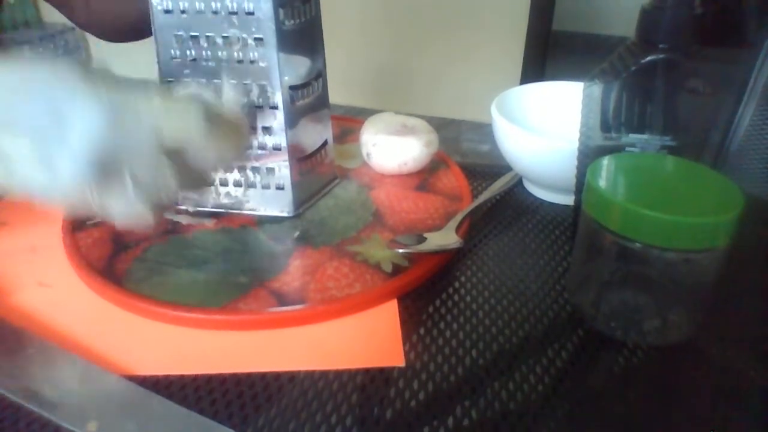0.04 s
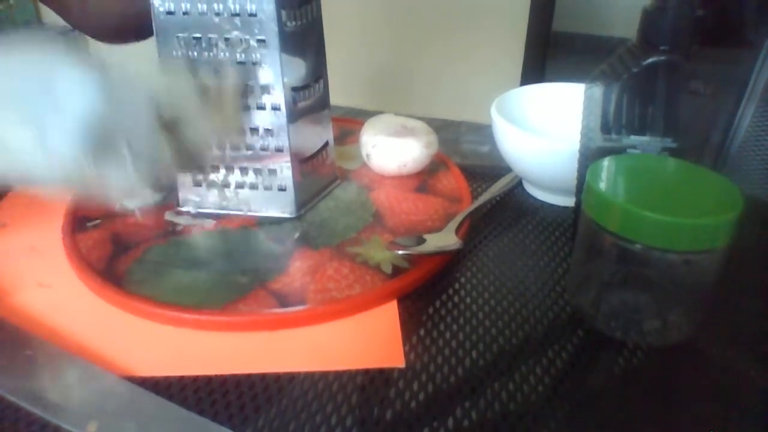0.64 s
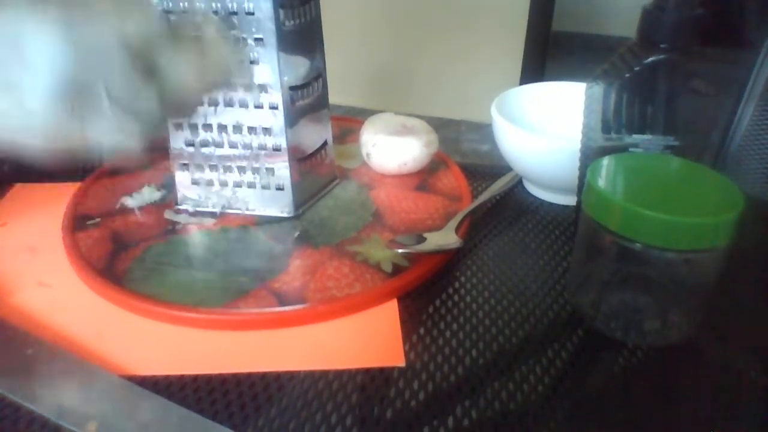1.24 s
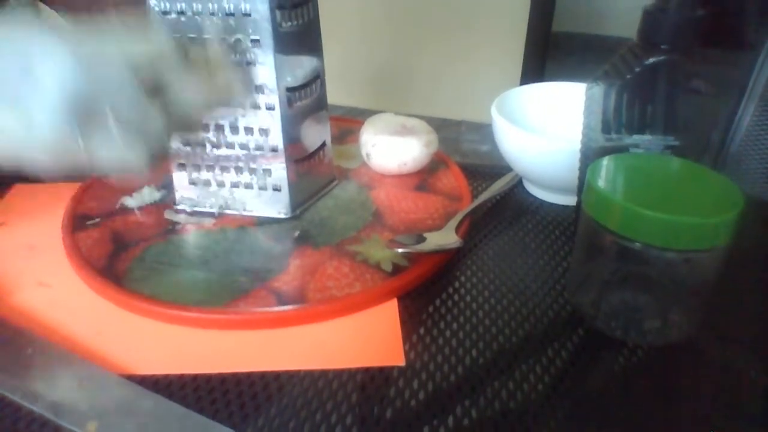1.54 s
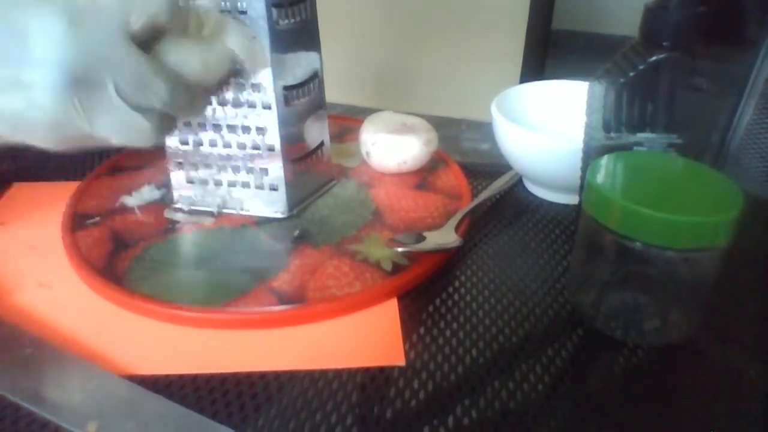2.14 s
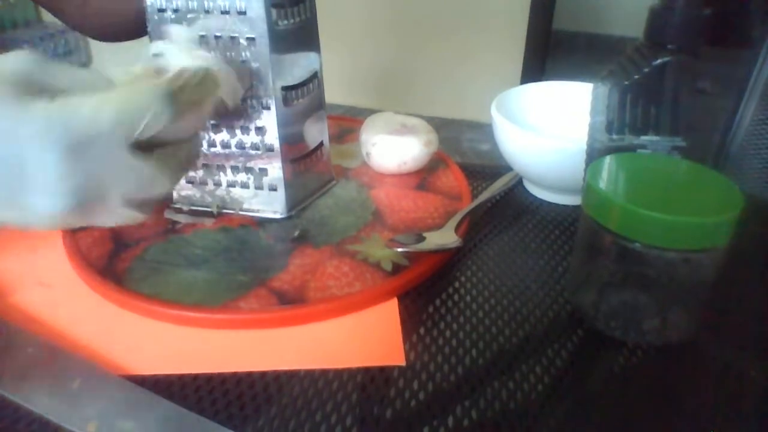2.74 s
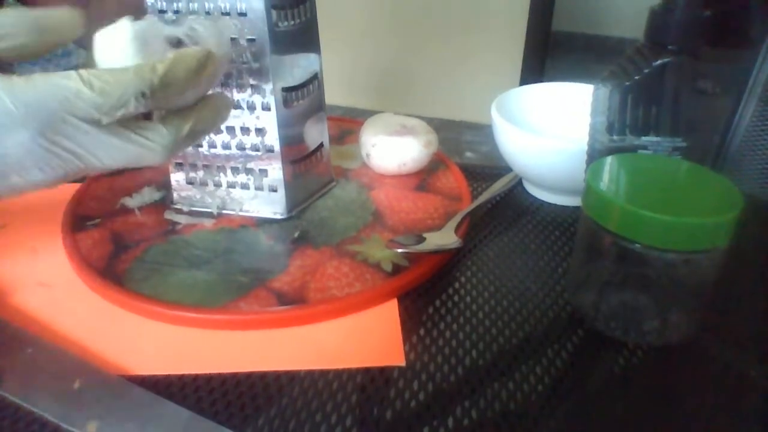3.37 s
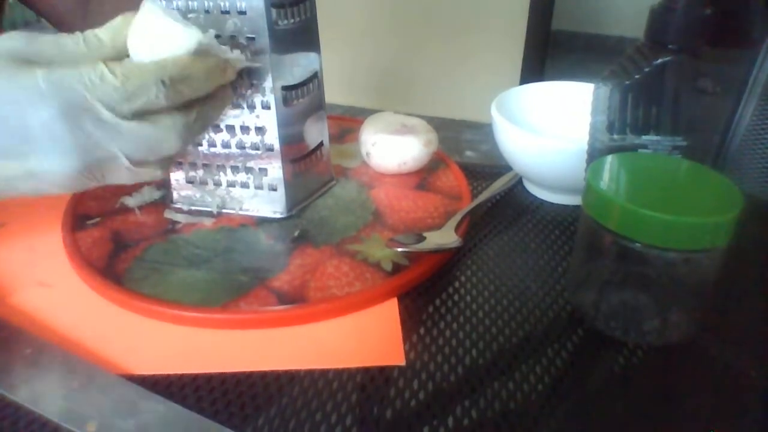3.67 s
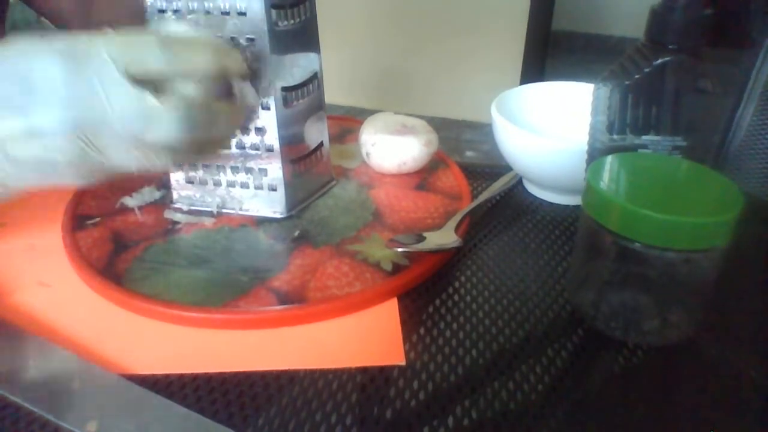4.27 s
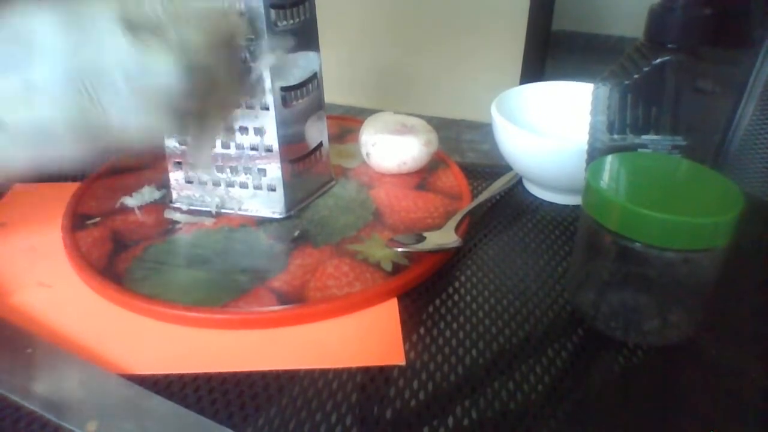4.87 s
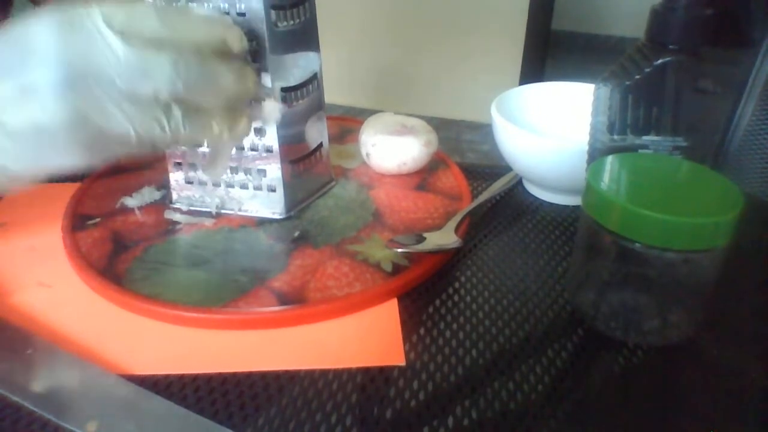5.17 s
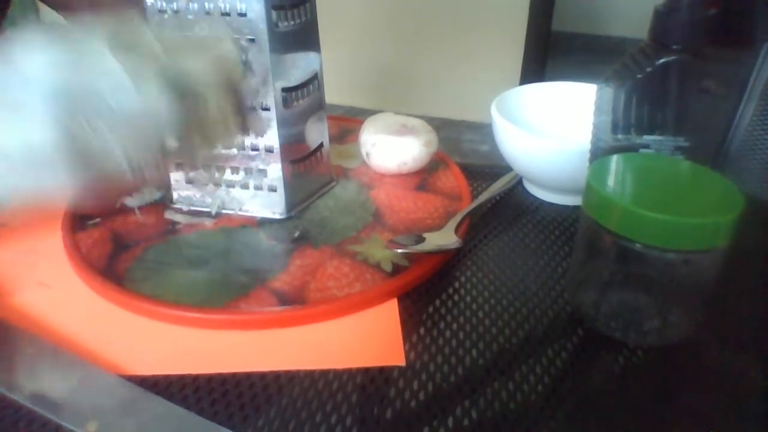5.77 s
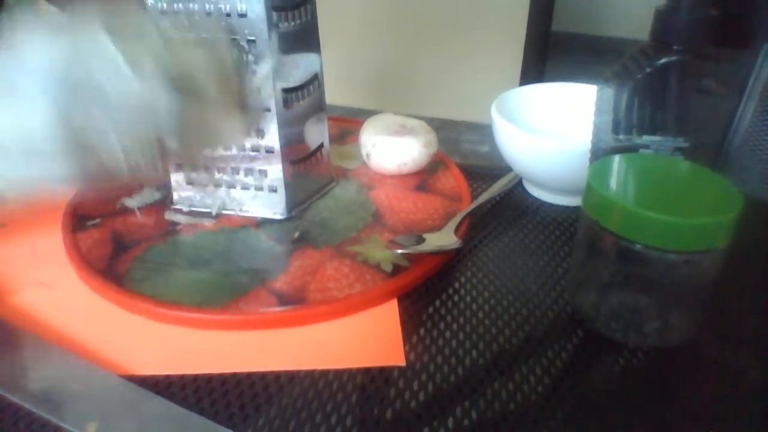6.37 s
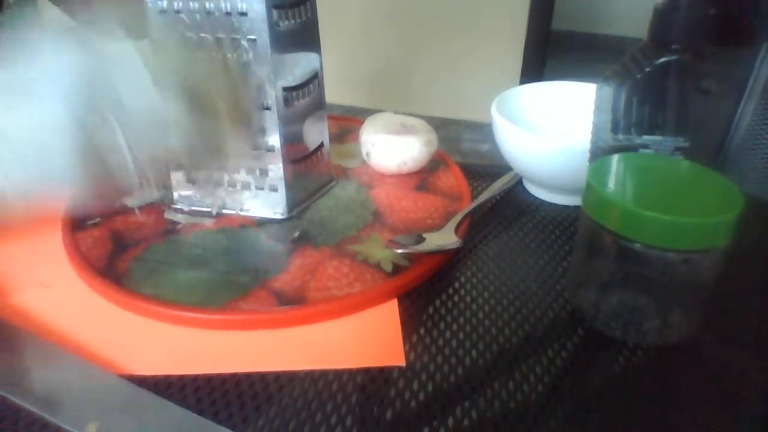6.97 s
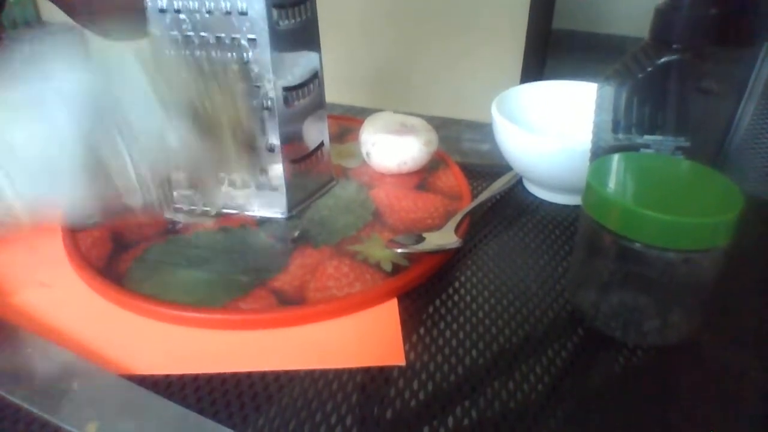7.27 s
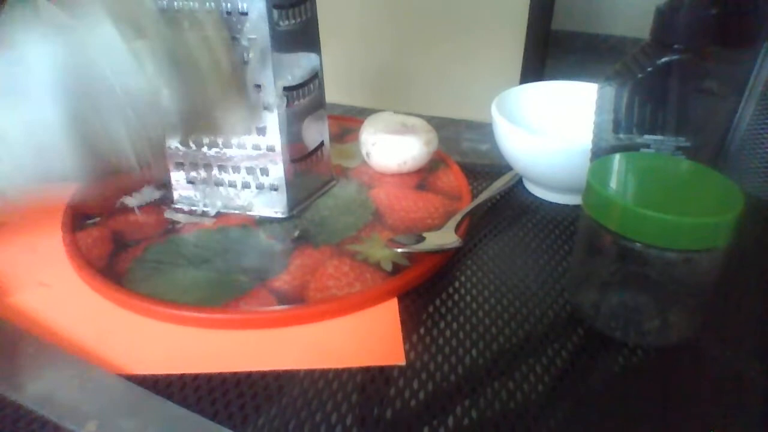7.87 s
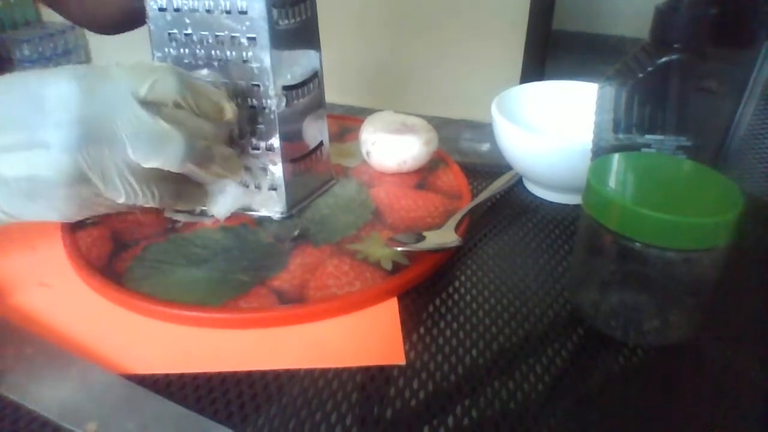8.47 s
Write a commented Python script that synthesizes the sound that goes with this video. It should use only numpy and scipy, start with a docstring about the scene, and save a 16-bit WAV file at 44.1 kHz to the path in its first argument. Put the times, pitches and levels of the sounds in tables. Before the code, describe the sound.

From the start, an onion is grated on a steel box grater close to the microphone, about seven strokes a second. Each stroke is a wet, crunchy rasp with a hollow metallic ring, broken by sharp snags and little spits of juice. The grater knocks on a plastic tray, and tiny high pings come around 2 seconds. The strokes stop at about 2.5 seconds, leaving a lull with a soft bump near 3.8. Grating restarts gently at 4.2 seconds and is strong from 4.5, with faint wet squeaks until 5.7 and a heavier thud near 7.3. It ends around 8.3 seconds, followed by one light knock at 8.5. The table shakes the microphone, adding a deep rumble that swells during both bouts. A small fan hums steadily throughout, with faint hiss and a thin, pulsing electronic whine. The kitchen adds only a slight, short echo.

```python
"""In a kitchen, an onion is rubbed up and down a steel box grater standing on a plastic tray,
in two bouts with a pause to change grip. The teeth tear the flesh and make the steel sheet ring;
the onion snags, spits juice and squeals, and the grater knocks on the tray. The arm's effort shakes
the table and the microphone standing on it. A small fan hums nearby and electronics whine faintly."""
import sys
import numpy as np
from scipy import signal
from scipy.fft import rfft, irfft, next_fast_len
from scipy.io import wavfile
from scipy.ndimage import uniform_filter1d, map_coordinates

SR = 44100
rng = np.random.default_rng(int(sys.argv[2]) if len(sys.argv) > 2 else 0)


def log_audio(samples):
    """Write samples as a 16-bit WAV file to the path given in sys.argv[1]."""
    # one column per channel
    frames = np.atleast_2d(samples).T
    # limit to full scale, then quantise
    limited = np.clip(frames, -1, 1)
    pcm = np.round(limited * 32767).astype(np.int16)
    wavfile.write(sys.argv[1], SR, pcm)


N = 384552
TIME = np.arange(N) / SR

# Passes over the teeth, about seven a second. Each row: start in seconds, force in dB.
STROKES = [(0, -43), (0.13, -38), (0.264, -39), (0.416, -37), (0.571, -38.5), (0.7, -36.5), (0.843, -39.5),
           (0.972, -35.5), (1.116, -38.5), (1.252, -35.5), (1.401, -40.5), (1.54, -40.5), (1.708, -41.5),
           (1.838, -38), (1.967, -41.5), (2.115, -37.5), (2.262, -40.5), (2.377, -41.5), (4.191, -50),
           (4.338, -48), (4.486, -37.5), (4.628, -40.5), (4.814, -39.5), (4.959, -42.5), (5.126, -42),
           (5.269, -42), (5.416, -37), (5.532, -39.5), (5.68, -38), (5.826, -38), (5.989, -36.5),
           (6.124, -38), (6.278, -36.5), (6.414, -38), (6.566, -36), (6.711, -38.5), (6.874, -35.5),
           (7.014, -36.5), (7.169, -37), (7.315, -37), (7.477, -35), (7.606, -38), (7.76, -37.5),
           (7.909, -38.5), (8.049, -36.5)]
# The onion rubs on while the hand turns. Each row: middle and half length in seconds, force in dB.
TURN_RUBS = [(0.248, 0.046, -40), (2.27, 0.016, -39), (2.407, 0.039, -50), (4.304, 0.026, -52),
             (8.224, .035, -45.5)]
# The onion catches hard on the teeth. Each row: time in seconds, jolt in dB, wet snap in dB.
SNAGS = [(0.15, -8, -30), (0.441, -6.5, -31.5), (0.486, -17, -45.5), (0.53, -26, -37), (0.64, -14, -46),
         (0.724, -9, -34), (0.764, -9, -43), (0.811, -19, -40), (0.985, -15.5, -29), (1.041, -18, -37),
         (1.069, -16, -39), (1.314, -7, -47), (1.361, -14, -31), (1.562, -14.5, -48), (1.609, -4, -31),
         (1.624, -8, -36), (1.656, -8, -37), (1.771, -13, -37), (1.89, -5.5, -45), (2.169, -3.5, -30),
         (2.179, -5.5, -39), (2.475, -14.5, -39), (2.53, -28, -53), (4.198, -18, -36), (4.216, -14.5, -41),
         (4.433, -19, -38), (4.839, -16, -53), (5.929, -11, -39), (6.903, -11, -36), (6.93, -11.5, -48),
         (7.052, -9, -51), (7.087, -10, -47), (7.508, -9.5, -39), (7.831, -6.5, -41), (8.566, -36, -54)]
# Plucked teeth. Each row: start in seconds, level in dB, seconds to fade by 60 dB,
# overtone in dB compared with the note.
TOOTH_PINGS = [(1.668, -44, .12, -16), (1.911, -43, .14, -15), (2.125, -48, .1, -14), (2.195, -42, .3, -17),
               (2.239, -38.5, .16, -4), (2.321, -34.5, .18, -20), (7.311, -42, .07, -18),
               (7.455, -44, .06, -16)]
# Onion cells spit juice. Each row: start in seconds, level in dB, pitch in Hz.
JUICE_SPITS = [(0.329, -33, 8000), (0.726, -31, 4500), (0.766, -39, 11000), (0.933, -35, 7500),
               (1.275, -35, 5000), (1.561, -32.5, 4000), (4.216, -37.5, 4200), (4.306, -41, 8500),
               (4.44, -41, 10500), (4.521, -31, 4900), (4.529, -33, 9500), (4.839, -35, 4000),
               (5.21, -39, 6500), (6.644, -35, 8000), (7.049, -33, 8500), (7.632, -33, 8000),
               (7.936, -35, 9000), (8.089, -35, 9000)]
# Wet skin squeals on the steel. Each row: middle and half length in seconds, level in dB.
SKIN_SQUEALS = [(4.516, 0.026, -48), (4.75, 0.011, -44.5), (5.334, .015, -43.5), (5.473, 0.036, -40),
                (5.74, 0.026, -45)]
# The grater rocks. Each row: start in seconds, tray knock in dB, table thud in dB, contact in seconds.
KNOCKS = [(0.265, -1.5, -8, 0.00029), (0.303, -5.5, -3, 0.00018), (0.487, -11, -10, 0.00033),
          (0.812, -18, -16, 0.00074), (1.072, -11.5, -10, 0.00047), (1.31, -35, -11, .0003),
          (1.657, -13, -9, 0.00042), (1.907, -7.5, -6, 0.00029), (2.054, -12.5, -16, 0.00042),
          (2.211, -8.5, -9.5, 0.00026), (2.325, -3, -26, 0.00014), (2.573, -18.5, -41, 0.0003),
          (3.789, -37, -27, 0.00031), (4.252, -17, -23, 0.0014), (4.583, -10.5, -20, 0.00098),
          (4.785, -15, -13.5, 0.0006), (5.049, -21, -12, 0.00092), (7.318, -24, -2, 0.00026),
          (7.35, -9, -3, 0.00031), (7.551, -18, -11.5, 0.00063), (7.833, -17, -13, 0.00054),
          (8.136, -15.5, -14, 0.00044), (8.513, -17.5, -30, 0.00033)]
# How hard the arm works. Each row: time in seconds, effort in dB.
ARM_EFFORT = [(0, -0.5), (.25, 1.5), (2.45, 0), (2.75, -10), (3.55, -13.5), (4.12, -18), (4.26, -8.5),
              (4.75, -8), (5.6, 0), (8.1, 0.5), (8.3, -5), (8.72, -7)]

# The notes that each part rings at. Each row: pitch in Hz, width in Hz, level in dB.
SHEET_NOTES = [(743, 36, -5.5), (850, 50, -7.5), (955, 38, -2), (1075, 40, -3), (1222, 44, 7.5),
               (1302, 48, 2.5), (1385, 65, 0.5), (1680, 380, -11), (1925, 90, -6.5), (2150, 110, -5.5),
               (2275, 70, -7), (2740, 220, -15)]  # the grater's steel sheet
TEETH_NOTES = [(3740, 560, 7), (4470, 290, -9), (5120, 480, 7), (7420, 290, -7)]  # its raised teeth
SIDE_WALL_NOTES = [(910, 11, -22), (1200, 20, 5), (1255, 30, -3)]  # its hollow-sounding sides, which the onion does not press on
TRAY_NOTES = [(88.3, 8.8, 2), (111.4, 17.7, 1.5), (171, 106, -4), (217, 31, 2.5), (283, 22, -2),
              (394.6, 50, -4.5), (480, 134, -10)]  # the tray and table top

# How strong each noise is from low to high. Each row: frequency in Hz, level in dB.
TEARING_SPECTRUM = [(300, -19), (700, 20), (1500, 3), (2200, -12.5), (2500, -17.5), (3200, 0.5),
                    (3700, 4.5), (4400, 3.5), (5300, 2.5), (5750, -1), (6700, -1.5), (7600, 4), (8800, -3),
                    (10200, 0), (11000, -4), (13000, -5), (15700, -11)]
JUICE_SPECTRUM = [(2500, -38), (4500, 0.5), (9000, -5.5), (15000, -11)]
SWAY_SPECTRUM = [(2, -3.5), (6, 4.5), (11, 1.5), (17, -5.5), (26, -18), (40, -23.5), (70, -41), (200, -117)]
FAN_AIR_SPECTRUM = [(20, -2), (100, -32), (160, -14), (220, -9.5), (350, -10.5), (420, 6), (480, 7),
                    (560, 1), (630, -11), (740, -6.5), (820, -10.5), (1300, -17.5), (2200, -19.5),
                    (2800, -26.5), (7000, -87)]
HISS_SPECTRUM = [(100, -18), (2800, 8.5), (3500, 14), (4200, 9), (7200, 6), (7850, 10), (8300, 5),
                 (12000, 5), (15200, 4), (15650, 10)]

# The fan's hum. Each row: multiple of the blade rate, level in dB.
FAN_TONES = [(2, -50.5), (3, -42), (4, -56), (6, -59.5), (7, -65)]
# The electronics' whine. Each row: pitch in Hz, level in dB.
WHINE_TONES = [(8000, -58), (11321, -63.5), (12679, -63.5), (14643, -72)]

LAST_STROKE_S, REST_S = .15, .25  # length of a bout's last pass; shortest gap that counts as a rest
TEAR_DB, SHEET_DB = -4.5, 9  # added to the force of a pass
USUAL_FORCE_DB, SHEET_GROWTH = -38, 1.81  # the sheet gains this many dB per dB of extra force
TABLE_TOP_HZ = 43.65


def grating():
    """Bursting cells hiss, while coarser slips from tooth to tooth drum on the steel sheet."""
    tear_gain, sheet_gain = stroke_gains(tear_power=2.5, full_bite=.78, slip_power=1.9, drag_db=-17)
    grip_db = np.linspace(2, 0, N) * wobble(70)  # the grip evens out as the onion wears soft
    pressure = np.clip(tear_gain / amp(-31), 0, 1)
    cells = unit(crackle(rate=1800, spread_db=4.5) + .7 * noise())
    tearing = unit(coloured(cells, TEARING_SPECTRUM)) * tear_gain * amp(grip_db - 1)
    rasp = unit(resonated(cells, TEETH_NOTES)) * tear_gain * amp(-11)
    cracks = fibres(rate=650, centre_hz=6500, pitch_spread=.4, cycles=20, spread_db=4)
    crunch = unit(coloured(cracks, JUICE_SPECTRUM)) * tear_gain * np.sqrt(pressure) * amp(-5)
    slips = unit(crackle(rate=620, spread_db=.5) + .78 * noise())
    drive = slips * sheet_gain * amp(grip_db + .23 * wobble(60))
    free_ring = resonated(drive * (1 - pressure), SHEET_NOTES)
    pressed_ring = amp(-11) * resonated(drive * pressure, pressed_sheet())
    sheet = amp(14.5) * gliding(cushioned(free_ring + pressed_ring))
    sides = amp(5) * resonated(drive, SIDE_WALL_NOTES)
    tray = unit(resonated(slips, TRAY_NOTES)) * sheet_gain * amp(-5)  # reached through the grater's feet
    return tearing + rasp + crunch + sheet + sides + tray


def passes():
    """The hand goes up (-1) and down (+1) in turn, and always down after a rest."""
    rows, direction = [], -1
    gaps = np.diff(np.array(STROKES)[:, 0], append=np.inf)
    for (start, force_db), gap in zip(STROKES, gaps):
        rows.append((start, gap if gap < REST_S else LAST_STROKE_S, force_db, direction))
        direction = -direction if gap < REST_S else 1
    return rows


def stroke_gains(tear_power, full_bite, slip_power, drag_db, stall_s=.017, stall_db=-5):
    """Tearing and slipping follow the hand's speed, and dip as the onion sticks before a snag."""
    gains, stuck = np.zeros((2, N)), np.zeros(N)
    for start, length, force_db, _ in passes():
        progress = np.linspace(0, 1, int(length * SR)) ** .98  # top speed comes just before halfway
        speed = np.abs(np.sin(np.pi * progress))
        cutting = np.tanh((speed / full_bite) ** tear_power)  # levels off once all the teeth cut
        sheet_db = USUAL_FORCE_DB + SHEET_DB + SHEET_GROWTH * (force_db - USUAL_FORCE_DB)
        add(gains[0], start, amp(force_db + TEAR_DB) * unit(cutting))
        add(gains[1], start, amp(sheet_db) * unit(amp(drag_db) + speed ** slip_power))
    for middle, half, force_db in TURN_RUBS:
        gains += amp([[force_db + TEAR_DB], [force_db + SHEET_DB]]) * swell(middle, half)
    for release, _, _ in SNAGS:
        add(stuck, release - stall_s, np.ones(int(stall_s * SR)))
    return gains * amp(stall_db * uniform_filter1d(np.minimum(stuck, 1), SR // 1000))


def fibres(rate, centre_hz, pitch_spread, cycles, spread_db):
    """Fibres break one by one, each a tiny crack with its own pitch and size."""
    count, t = int(rate * N / SR), np.arange(SR // 250) / SR
    starts = rng.integers(N, size=(count, 1))
    pitch, size = np.clip(rng.standard_normal((2, count, 1)), -2, 2)
    turns = centre_hz * np.exp(pitch_spread * pitch) * t
    cracks = amp(spread_db * size - 60 * turns / cycles) * np.sin(2 * np.pi * turns)
    positions = starts + np.arange(len(t))
    return unit(np.bincount(positions.ravel(), cracks.ravel(), N)[:N])


def pressed_sheet(damping=1.25, stiffening=1.05):
    """With the onion pushed hard against it, the sheet rings a little higher and dies sooner."""
    return np.array(SHEET_NOTES) * [stiffening, damping, 1]


def gliding(ring, depth=.024):
    """The onion weighs on the sheet: the pitch rises on the way down and falls on the way up."""
    place = np.zeros(N)  # -1 at the top, +1 at the bottom
    for start, length, _, direction in passes():
        add(place, start, -direction * np.cos(np.linspace(0, np.pi, int(length * SR))))
    return map_coordinates(ring, [np.arange(N) + depth * np.cumsum(place)])


def cushioned(push, cutoff_hz=3900):
    """Soft flesh dulls a push on its way to the steel."""
    return filtered(push, lambda hz: 1 / (1 + 1j * hz / cutoff_hz) ** 2)


def snags(jolt_fade_s, snap_fade_s, snap_rise_s, hard_db):
    """A snag lets go with a jolt to the sheet and a wet snap; hard ones crunch through the flesh."""
    jolts, breaks, snaps = np.zeros((3, N))
    t = np.arange(SR // 8) / SR
    for start, jolt_db, snap_db in list(SNAGS) + light_catches():
        jolt = rng.standard_normal(len(t))
        jolt[0] += 10  # the release itself is one sharp kick
        jolt *= amp(jolt_db - 60 * t / jolt_fade_s)
        add(jolts, start, jolt)
        add(breaks, start, jolt * np.clip(amp(jolt_db - hard_db), 0, 1))
        add(snaps, start, amp(snap_db - 60 * t / snap_fade_s) * (1 - np.exp(-t / snap_rise_s)))
    cells = unit(crackle(rate=2900, spread_db=5) + .8 * noise())
    ring = resonated(jolts, pressed_sheet())
    crunch = amp(-1.5) * resonated(breaks, [(820, 34, .5), (1480, 270, -3), (2200, 1500, -14)])
    return cushioned(ring + crunch) + amp(3) * coloured(snaps * cells, TEARING_SPECTRUM)


def light_catches(offset_db=-5, spread_db=2.5):
    """The onion also snags lightly at a random moment in the fast part of each pass."""
    rows = []
    for start, force_db in STROKES:
        when, size = rng.uniform(-1.1, 1, 2)
        moment = start + LAST_STROKE_S * (1 + when / 2) / 2
        snap_db = force_db + offset_db
        rows.append((moment, snap_db + spread_db * size, snap_db))
    return rows


def pings(tooth_hz, overtone_hz):
    """A plucked tooth rings high and thin until the onion damps it."""
    out, t = np.zeros(N), np.arange(SR // 4) / SR
    attack = 1 - np.exp(-t / .002)
    for start, db, fade_s, overtone_db in TOOTH_PINGS:
        ring = np.sin(2 * np.pi * tooth_hz * t) + amp(overtone_db) * np.sin(2 * np.pi * overtone_hz * t)
        add(out, start, amp(db + 3 - 60 * t / fade_s) * attack * ring)
    return out


def spits(fade_s, sharpness):
    """A cell bursts and spits juice: a crisp tick of fizz around its own pitch."""
    out, t = np.zeros(N), np.arange(SR // 30) / SR
    for start, db, hz in JUICE_SPITS:
        fizz = signal.filtfilt(*signal.iirpeak(hz, sharpness, SR), rng.standard_normal(len(t)))
        add(out, start, amp(db - 60 * t / fade_s) * unit(fizz))
    return out


def squeals(centre_hz, width_hz):
    """Wet skin sticks and slips very fast, stirring a high note in the teeth."""
    gain = sum(amp(db) * swell(middle, half) for middle, half, db in SKIN_SQUEALS)
    return gain * unit(resonated(noise(), [(centre_hz, width_hz, 0)]))


def knocks(rattle_s, rattle_loss_db, feet_hz):
    """The grater bumps the tray, then chatters on its feet; it is too light to pass on much bass."""
    pushes, t = np.zeros(N), np.arange(SR // 20) / SR
    for start, db, _, contact_s in KNOCKS:
        push = t / contact_s * np.exp(-t / contact_s)
        for late in np.append(0, rng.random(5)):
            add(pushes, start + late * rattle_s, amp(db - rattle_loss_db * late) * push)
    through_feet = filtered(pushes, lambda hz: 1j * hz / (feet_hz + 1j * hz))
    return amp(14) * resonated(through_feet, TRAY_NOTES)


def table(travel=.85):
    """The harder the arm works, the more the table sways, its top booms and the tray rumbles."""
    effort_db = np.interp(TIME, *np.transpose(ARM_EFFORT))
    swing = signal.hilbert(unit(coloured(noise(), SWAY_SPECTRUM)))
    swing_size = np.sqrt(.5 + uniform_filter1d(np.abs(swing) ** 2, SR // 10))
    sway = amp(-9 + effort_db) * unit(swing.real / swing_size)  # the arm keeps the swings even
    boom = amp(-21 + 1.5 * effort_db) * unit(resonated(noise(), [(TABLE_TOP_HZ, 11, 0)]))
    motion = travel * np.tanh((sway + boom + thuds(swell_s=.024)) / travel)  # legs stiffen at wide swings
    jitter = unit(crackle(rate=300, spread_db=1) + noise())
    rumble = amp(-30 + .78 * effort_db) * unit(resonated(jitter, TRAY_NOTES))
    return motion + rumble


def thuds(swell_s):
    """Each knock swings the table top for a few cycles."""
    out, t = np.zeros(N), np.arange(SR // 3) / SR
    thud = t / swell_s * np.exp(1 - t / swell_s) * np.sin(2 * np.pi * TABLE_TOP_HZ * t)
    for start, _, db, _ in KNOCKS:
        add(out, start, amp(db) * thud)
    return out


def kitchen(sound, fade_s, echo_db):
    """The nearby walls add a faint, short echo."""
    t = np.arange(SR // 4) / SR
    tail = rng.standard_normal(len(t)) * amp(-60 * t / fade_s) * (t > .003)
    return sound + amp(echo_db) * signal.fftconvolve(sound, tail / np.linalg.norm(tail))[:N]


def fan(blade_hz, drift):
    """Air rushes through the fan's housing under the slightly unsteady hum of its blades."""
    phase = 2 * np.pi * np.cumsum(blade_hz * (1 + drift * wobble(8))) / SR
    hum = sum(np.sqrt(2) * amp(db + 2.7 * wobble(4.136)) * np.sin(round(k) * phase)
              for k, db in FAN_TONES)
    return hum + amp(-36) * unit(coloured(noise(), FAN_AIR_SPECTRUM))


def electronics(pulse_hz):
    """The electronics hiss, and their thin whine jumps between loud and soft."""
    pulse = .35 + (np.sin(2 * np.pi * pulse_hz * (TIME - .035)) > -.3)
    whine = sum(amp(db + 3) * np.sin(2 * np.pi * hz * TIME) for hz, db in WHINE_TONES)
    return unit(pulse) * whine + amp(-48) * unit(coloured(noise(), HISS_SPECTRUM))


def amp(db):
    """Turn decibels into a gain."""
    return 10 ** (np.asarray(db) / 20)


def unit(x):
    """Scale a sound to an average (rms) level of 1."""
    return x / np.sqrt(np.mean(x ** 2) + 1e-20)


def noise():
    """White noise at level 1."""
    return rng.standard_normal(N)


def crackle(rate, spread_db):
    """Tiny random clicks of scattered sizes, about `rate` a second."""
    return unit((rng.random(N) < rate / SR) * np.sign(noise()) * amp(spread_db * np.clip(noise(), -2, 2)))


def wobble(rate):
    """A smooth curve through `rate` random values a second."""
    return map_coordinates(rng.standard_normal(int(N * rate / SR) + 4), [TIME * rate])


def swell(middle_s, half_s):
    """A bell-shaped rise and fall."""
    return np.exp(-((TIME - middle_s) / half_s) ** 2)


def filtered(x, response):
    """Multiply each frequency in a sound by response(hz)."""
    size = next_fast_len(N + SR // 2)
    return irfft(rfft(x, size) * response(np.fft.rfftfreq(size, 1 / SR)), size)[:N]


def coloured(x, spectrum):
    """Shape a sound with a curve through (Hz, dB) points."""
    points_hz, db = np.transpose(spectrum)
    return filtered(x, lambda hz: amp(np.interp(np.log(hz + .11), np.log(points_hz), db)))


def resonated(x, notes):
    """Let a sound ring a body's notes, each given as pitch in Hz, width in Hz, level in dB."""
    return filtered(x, lambda hz: sum(
        (-1) ** k * amp(db) * 1j * hz * width / (pitch ** 2 - hz ** 2 + 1j * hz * width)
        for k, (pitch, width, db) in enumerate(notes)))


def add(track, start_s, sound):
    """Mix a sound into a track at the given time."""
    part = track[max(round(start_s * SR), 0):][:len(sound)]
    part += sound[:len(part)]


def scene():
    """Everything reaches one microphone; the two channels differ very slightly, most in the lows and the
    highest treble."""
    bites = snags(jolt_fade_s=.075, snap_fade_s=.04, snap_rise_s=.002, hard_db=-18)
    teeth = pings(tooth_hz=6568, overtone_hz=11370)
    juice = spits(fade_s=.028, sharpness=1.6)
    grater = grating() + bites + teeth + juice + squeals(centre_hz=5300, width_hz=570)
    mono = kitchen(grater, fade_s=.16, echo_db=-20)
    mono += knocks(rattle_s=.055, rattle_loss_db=3, feet_hz=90) + table()
    mono += fan(blade_hz=164.7, drift=.003983) + electronics(pulse_hz=25)
    side = coloured(mono, [(60, -33.5), (250, -56), (1000, -65), (3000, -54), (12000, -30.5)])
    return np.array([mono - side, mono + side])


def record(dry):
    """The widest swings clip, and the very highest treble is cut off."""
    return np.array([filtered(channel, lambda hz: hz < 15800) for channel in np.clip(dry, -1, 1)])


dry = scene()
out = record(dry)
log_audio(out)
```